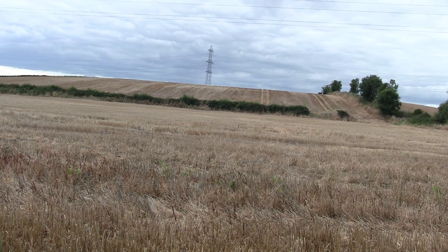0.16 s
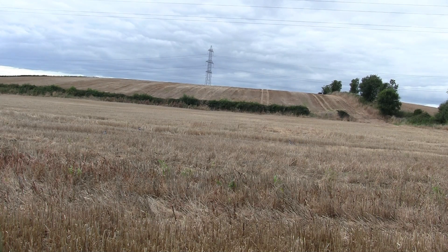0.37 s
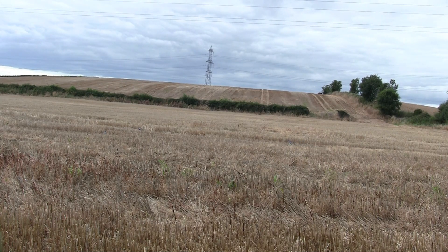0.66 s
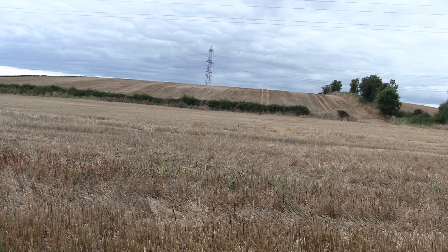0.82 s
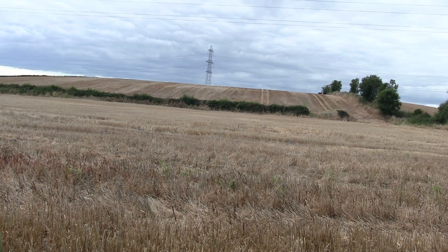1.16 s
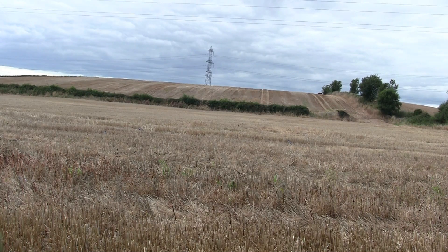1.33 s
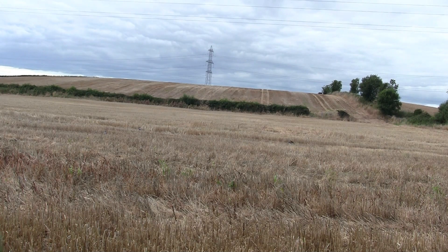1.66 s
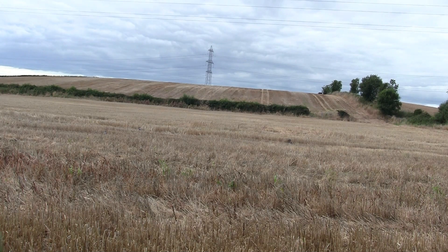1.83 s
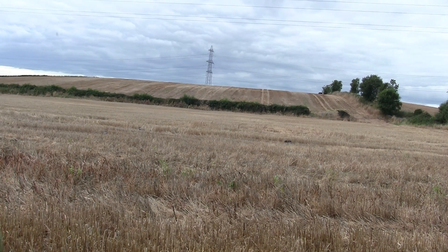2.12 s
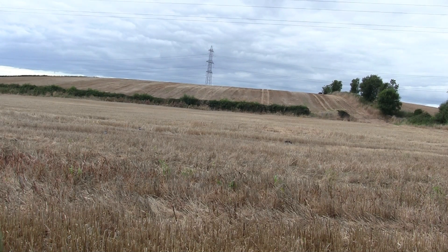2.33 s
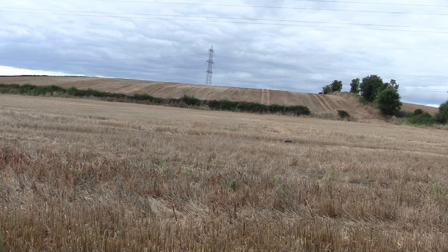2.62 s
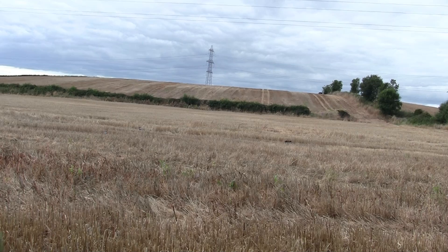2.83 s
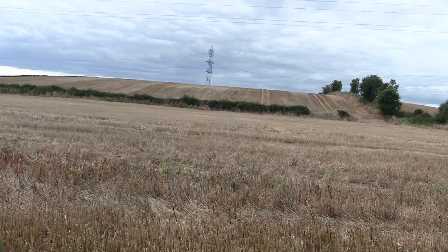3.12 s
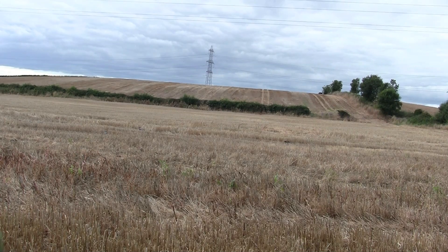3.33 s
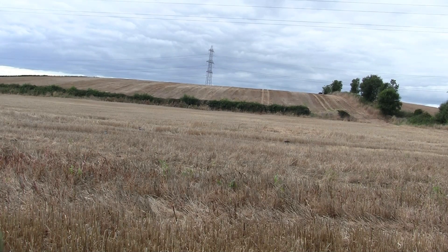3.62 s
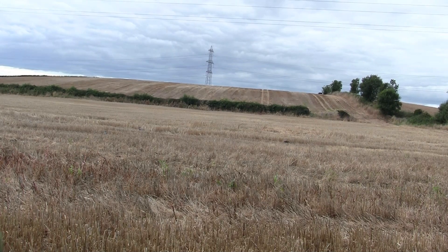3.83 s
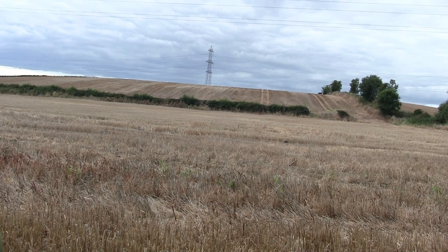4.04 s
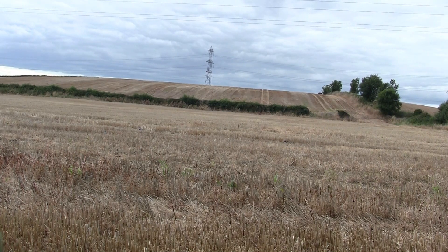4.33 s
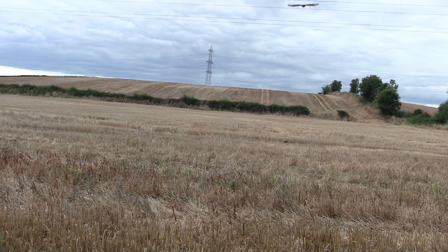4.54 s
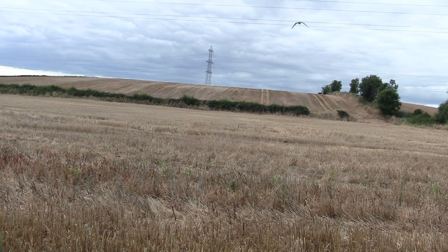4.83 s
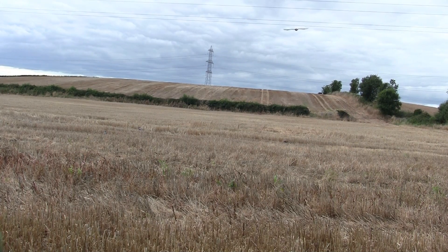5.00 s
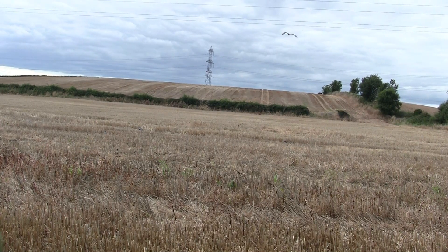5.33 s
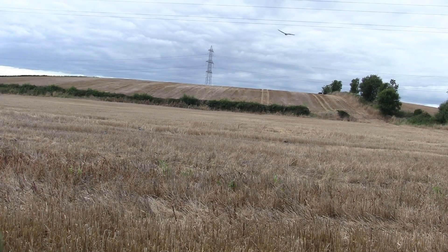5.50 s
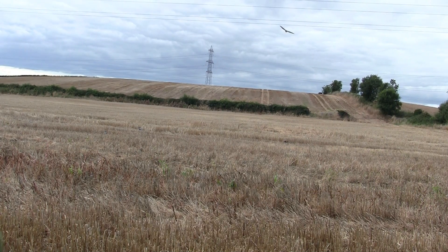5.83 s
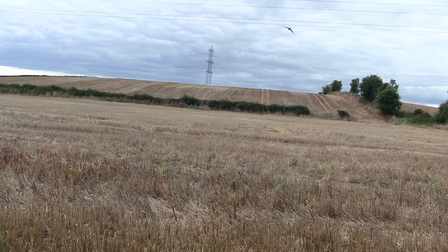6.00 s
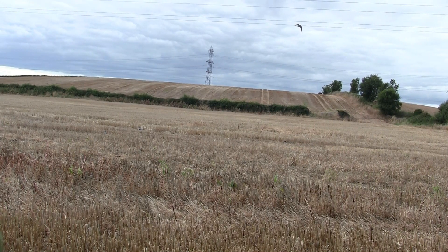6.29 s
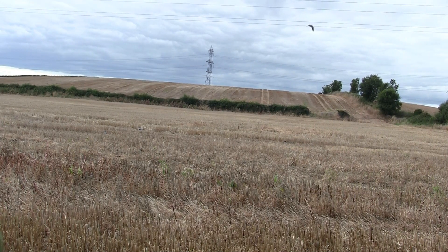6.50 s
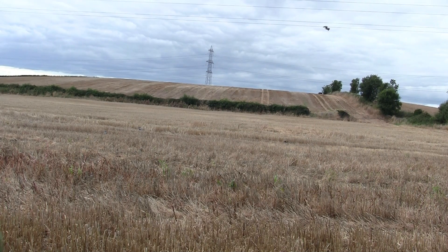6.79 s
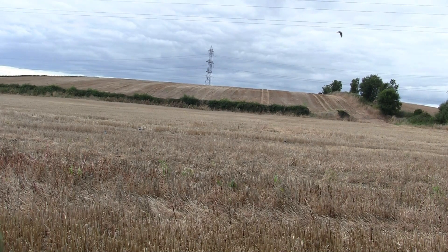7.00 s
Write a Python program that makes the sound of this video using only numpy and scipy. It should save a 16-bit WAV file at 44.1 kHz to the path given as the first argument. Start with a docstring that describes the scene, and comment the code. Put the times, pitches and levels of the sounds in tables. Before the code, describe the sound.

Loud plastic clicks close by, then plaintive bird-of-prey mews sinking in pitch, over a quiet rural rumble with soft rustling and faint chirps.

```python
"""Over a steady rural rumble of filtered noise, a small bird gives a few thin chirps: short arches of a sine tone.
Then plastic gear snaps and rattles close by as it is handled: noise cracks excite a hollow case and a metal fitting.
A soft hiss of rustling swells, and buzzards mew four times, the second and third calls overlapping: harmonics swoop up
to a crest, sink and break into a weak, hoarse tail, swelling as one slides through the resonance of the beak.
The recorder's gain ducks after sounds with strong treble, such as the loudest clicks, and creeps back."""
import sys
import numpy as np
from scipy import signal
from scipy.fft import rfft, irfft
from scipy.io import wavfile
from scipy.ndimage import uniform_filter1d

SR = 44100
rng = np.random.default_rng(int(sys.argv[2]) if len(sys.argv) > 2 else 0)


def master_out(mix):
    """Clip the mix to full scale and print it as 16-bit PCM to the path in sys.argv[1]."""
    frames = np.transpose(np.atleast_2d(mix))
    ceiling = np.clip(frames, -1, 1)
    pcm = np.round(ceiling * 32767).astype(np.int16)
    wavfile.write(sys.argv[1], SR, pcm)


N = 315315
TIME = np.arange(N) / SR

# spectrum of the far rumble: frequency_hz, level_db
FIELD_SPECTRUM = [(15, -48), (25, -15.5), (97, -4.5), (363, -6.5), (489, -6), (575, -8), (775, -4.5),
                  (840, -6.5), (1020, -9.5), (1890, -22), (3820, -25), (5140, -26.5), (6050, -27),
                  (14800, -39.5), (16000, -42.5)]
# likeness of the rumble in the two channels: frequency_hz, correlation (-1 to 1)
CHANNEL_LIKENESS = [(40, 0.4), (100, 0.23), (200, 0.53), (380, .4), (480, 0.92), (1050, 0.9), (1500, .2),
                    (2200, 0.039), (12000, .08)]
FIELD_DB = -50
# spectrum of the rustling: frequency_hz, level_db
RUSTLE_SPECTRUM = [(500, -22), (1500, 4), (3000, 0.5), (5500, -2), (10000, -8.5), (13000, -12),
                   (16000, -29)]
# swells of soft rustling: start_s, length_s, level_db
RUSTLE_SWELLS = [(1.856, 0.85, -54), (2.596, 0.68, -67), (3.433, 0.65, -57), (3.958, 0.06, -44.5),
                 (4.284, 0.6, -50.5), (5.17, 0.38, -53.5)]
RUSTLE_EDGE = 0.16  # scale of a swell's rise and fall, as a share of its length
RUSTLE_REST_DB = -70
# calls of the small bird: start_s, length_s, middle_hz, slide_hz, level_db
BIRD_CHIRPS = [(0.187, .08, 5220, 700, -56), (.372, 0.074, 5300, -500, -59.5),
               (1.157, 0.035, 5250, 80, -63), (1.469, 0.066, 4720, -800, -39),
               (4.963, 0.055, 5230, 139, -61), (5.135, 0.072, 5520, -500, -61)]
CHIRP_ARCH_HZ_PER_S = 17000  # the longer a chirp, the higher its middle lies above its ends
# handling clicks: start_s, level_db, relative bass_db, relative rattle_db
HANDLING_CLICKS = [(1.5239, -15, -12.5, -1), (1.841, -40, -30, -17), (1.9113, -29, -13.5, 5),
                   (1.939, -35.5, -3, -9), (2.2358, -29, -9.5, -15.5), (2.361, -4, -26.5, -9),
                   (2.427, -19, -26, 6), (2.4722, -7.5, -33, 12), (2.4811, -6.5, -34, 0),
                   (2.5084, -30, -8, 8), (2.5228, -4, -26, 3.5), (2.674, -10, -32, -7),
                   (2.7247, -23, -11, 14), (2.733, -4.5, -28, -4), (2.7494, -11.5, -31, 6),
                   (2.7811, -10, -27, 4), (2.796, -6.5, -24.5, 11), (2.8142, -11, -23.5, 8),
                   (2.8453, -4.5, -27.5, -11.5), (2.8982, -31.5, -42, -3)]
# catches that snap shut: start_s, level_db, relative bass_db, rebound_after_s
SNAPPING_CATCHES = [(1.359, 0.5, -26.5, .018), (3.2208, -7, -39, 0.023)]
# the blows of a catch, slip, seat and rebound: relative level_db, left_minus_right_db, relative rattle_db
CATCH_BLOW_ROWS = [(-1.5, 19.5, -12), (-2, 7.5, -10.5), (-9.5, 3.5, -1.5)]
SEAT_S = 0.0052  # the catch seats this long after it slips
CLICK_PAN_DB = 6  # the gear is held to the left
TREBLE_DB, TREBLE_DB_PER_DB = -1, 0.37  # treble against the middle band; softer blows are duller
# spectrum of the plastic case: frequency_hz, level_db
CASE_SPECTRUM = [(88, -39), (150, -22), (439, -19.5), (759, -4.5), (1450, -7), (1900, -4.5), (3160, -3.5),
                 (3550, -7.5), (4410, -0.5), (4860, -2.5), (5570, 4.5), (6640, -2), (7770, -4.5),
                 (11500, -13.5), (16000, -18)]
# modes of the hollow in the case: frequency_hz (before detuning), level_db, t60_s
HOLLOW_MODES = [(313, -1.5, 0.14), (560.4, -3.5, 0.17), (846, -3, .05)]
# modes of a small metal fitting that rings along: frequency_hz, level_db, t60_s
FITTING_MODES = [(1970, -51, .5), (3698, -35.5, 0.31), (3900, -44, .2), (4870, -47, 0.35),
                 (6660, -40, 0.25)]
# pitch curve of each mew, from its crest to its end: time_s, pitch_hz
MEW_PITCH = [
    [(2.161, 1533), (2.196, 1434), (2.221, 1221), (2.263, 1329), (2.307, 1044), (2.325, 1299),
     (2.357, 1352), (2.42, 880), (2.506, 941), (2.556, 1080), (2.634, 644)],
    [(3.743, 1288), (3.789, 1211), (3.897, 945), (4.04, 767), (4.13, 753), (4.2, 636.7), (4.281, 617.3),
     (4.34, 487.5), (4.412, 411.5)],
    [(4.125, 1424), (4.26, 1203), (4.28, 1419), (4.425, 1032), (4.476, 1002), (4.49, 821), (4.516, 774),
     (4.534, 1020), (4.57, 1004), (4.595, 780), (4.64, 659), (4.741, 740)],
    [(6.5, 1422), (6.559, 1395), (6.618, 1239), (6.695, 1104), (6.73, 1189), (6.815, 1114), (6.835, 732),
     (6.924, 736), (6.946, 650), (6.975, 746), (7.023, 735), (7.065, 593)],
]
# mews: start_s, swoop_s, level_db, scrape_db, break_s, break_drop_db, release_s, left_minus_right_db
MEW_ROWS = [(2.09, .023, -19, -10, 2.38, -7.5, 0.01, -6.5), (3.65, .039, -20, -19, 3.97, -4.5, .015, -7.5),
            (4.056, 0.022, -24.5, -9, 4.395, -6.5, 0.11, 2.5),
            (6.384, .026, -35.5, -11, 6.85, -5.5, 0.0092, 0.5)]
# voice of each mew: throat tuning_ratio, beak_hz, partials under the throat's peak under_db, overtone_db,
# their flare at the crest flare_db, treble_db_per_octave, rasp (0-1), end_rasp (0-1), echo_db, left_late_ms
MEW_VOICES = [(1.055, 2510, 9, -3, 17.5, -2.5, 0.17, 0.6, -19, 0.29),
              (0.95, 2105, 8, 0, -1, -2, .09, .1, -39, .22),
              (1.004, 2565, 4.5, -2, 5, -16.5, 0.08, 0.6, -15, 0.054),
              (0.99, 2510, 4, 2, 1, -8, .05, 0.39, -14.5, 0.053)]
# throat and open beak at a tuning ratio of 1: frequency_hz, level_db
THROAT_SPECTRUM = [(400, -27.5), (750, -22.5), (1000, -25), (1300, -18), (1600, -11), (2000, 3.5),
                   (2450, 4), (2900, -5), (3300, -21), (4300, -20), (6000, -31), (9000, -36), (14000, -51)]
SWOOP = .55  # share by which a mew starts below its pitch
ATTACK_S, ATTACK_DB = 0.032, -19  # a mew opens in this time from this level
BREAK_S = 0.028  # time the voice takes to break
EFFORT_DB_PER_OCTAVE = 10.5  # the voice weakens as its pitch sinks
DULLING_DB_PER_OCTAVE = 4  # overtones fade faster than the rest as the pitch sinks
STRAIN_OCTAVES = 0.17  # overtones flare only about this close to the crest
UNDERTONE_DB = 7.5  # the fundamental is raised by this much once the voice has broken
BEAK_DB, BEAK_WIDTH_HZ = 8.5, 83  # sharp resonance on top of the throat's broad one
TOP_HZ = 16000  # top of the recorder's band


def undb(db):
    """Logarithmic level: decibels become an amplitude gain."""
    return 10 ** (np.asarray(db) / 20)


def unit(x):
    """Normalisation: the signal is scaled to rms 1."""
    return x / np.sqrt(np.mean(x ** 2))


def lookup(points, hz):
    """Interpolation: (frequency_hz, value) points are read on a log-frequency axis."""
    f, value = np.transpose(points)
    return np.interp(np.log(np.maximum(hz, 1)), np.log(f), value)


def colour(x, points):
    """Linear filtering: a (frequency_hz, level_db) response that falls away below its first point."""
    hz = np.arange(x.shape[-1] // 2 + 1) * SR / x.shape[-1]
    gain = undb(lookup(points, hz)) * np.minimum(hz / points[0][0], 1) ** 2
    return irfft(rfft(x) * gain, x.shape[-1])


def band(x, lo_hz, hi_hz):
    """Causal band-pass: only the sound between two frequencies is let through."""
    edges = [lo_hz, min(hi_hz, SR / 2 - 1)]
    return signal.sosfilt(signal.butter(2, edges, "band", fs=SR, output="sos"), x)


def walk(rate):
    """Smoothed chance: a random course of rms 1 that changes about `rate` times a second."""
    k = max(int(SR / rate), 1)
    steps = rng.standard_normal(N)[np.arange(N) // k]
    return unit(uniform_filter1d(uniform_filter1d(steps, k), k))


def pan(db):
    """Level difference between the ears: left and right gains of constant total power."""
    gains = undb(np.array([db, -db]) / 2).reshape(2, -1)
    return gains / np.sqrt(np.mean(gains ** 2, axis=0))


def lag(pair, left_late_ms):
    """Time difference of arrival: sound from one side reaches the two microphone ports at different times."""
    hz = np.arange(N // 2 + 1) * SR / N
    turn = np.exp(np.pi * 1j * hz * left_late_ms / 1000 * np.array([[-1], [1]]))
    return irfft(rfft(pair) * turn, N)


def scatter(x, t60, delay):
    """Diffuse reflection: a decaying noise tail of unit energy, different on each side."""
    t = TIME[:SR]
    tail = rng.standard_normal((2, SR)) * undb(-60 * t / t60) * (t > delay)
    tail /= np.sqrt(np.sum(tail ** 2, axis=1, keepdims=True))
    return signal.fftconvolve(x[None], tail, axes=1)[:, :N]


def ring(modes, t, detune):
    """Modal vibration: a sum of decaying sines, each detuned at random by the share `detune`."""
    out = 0
    for hz, db, t60 in modes:
        mode_hz = hz * (1 + detune * rng.standard_normal())
        out = out + undb(db - 60 * t / t60) * np.sin(2 * np.pi * mode_hz * t)
    return out


def field():
    """Partial coherence: mid and side noise form the far rumble of open country, with a low drone in it."""
    mid, side = colour(rng.standard_normal((2, N)), FIELD_SPECTRUM)
    alike = np.clip(lookup(CHANNEL_LIKENESS, np.arange(N // 2 + 1) * SR / N), -1, 1)
    mid = irfft(rfft(mid) * np.sqrt(1 + alike), N)
    side = irfft(rfft(side) * np.sqrt(1 - alike), N)
    air = unit(mid + side * np.array([[1], [-1]])) * undb(FIELD_DB + 0.72 * walk(7.0))
    drone = undb(-65) * unit(band(rng.standard_normal(N), 91.6, 100.7))
    # earlier on the left, a little stronger on the right
    return lag((air + drone) * pan(-2.2), left_late_ms=-0.25)


def rustle():
    """Addition of powers: a soft dry hiss whose swells rise, hold and die away over a faint rest level."""
    hiss = unit(colour(rng.standard_normal((2, N)), RUSTLE_SPECTRUM))
    power = undb(RUSTLE_REST_DB) ** 2
    for s, length, db in RUSTLE_SWELLS:
        inside = np.minimum(TIME - s, s + length - TIME) / length
        power = power + undb(db) ** 2 * (1 + np.tanh(inside / RUSTLE_EDGE)) / 2
    return hiss * np.sqrt(power) * undb(0.88 * walk(36))


def chirps():
    """Frequency modulation: thin whistles, each a small tilted arch of pitch, with diffuse reflections."""
    out = np.zeros(N)
    for s, length, middle_hz, slide_hz, db in BIRD_CHIRPS:
        u = np.linspace(0, 1, int(length * SR))
        arch_hz = CHIRP_ARCH_HZ_PER_S * length * (2 * u - 1) ** 2
        hz = middle_hz + slide_hz * (u - .5) - arch_hz
        hz = hz * (1 + .012 * walk(600)[:len(u)])
        tone = np.sin(2 * np.pi * np.cumsum(hz) / SR)
        first = int(s * SR)
        out[first:first + len(u)] += undb(db) * np.sin(np.pi * u) * tone
    return out + undb(-14.5) * scatter(out, t60=.2, delay=0.024)


def blows():
    """Succession of impacts: every blow as start_s, level_db, left_minus_right_db, bass_db, rattle_db."""
    rows = [(s, db, CLICK_PAN_DB, bass_db, rattle_db) for s, db, bass_db, rattle_db in HANDLING_CLICKS]
    for s, db, bass_db, rebound_s in SNAPPING_CATCHES:
        for after, (blow_db, pan_db, rattle_db) in zip((0, SEAT_S, rebound_s), CATCH_BLOW_ROWS):
            rows.append((s + after, db + blow_db, pan_db, bass_db, rattle_db))
    return rows


def clicks():
    """Impact excitation: a short crack and dying rattle of the case; its hollow knocks, a metal fitting rings."""
    out, t = np.zeros((2, N + SR)), TIME[:SR // 2]
    for s, db, pan_db, bass_db, rattle_db in blows():
        treble_db = TREBLE_DB + TREBLE_DB_PER_DB * db
        crack = np.exp(-np.abs(t - .0025) / np.where(t < .0025, .0005, .0012))
        rattle = undb(rattle_db) * np.exp(-t / 0.01) * np.minimum(t / 0.0053, 1)
        # partly shared by the two channels
        noise = rng.standard_normal((2, len(t))) + 0.51 * rng.standard_normal(len(t))
        snap = colour(noise, CASE_SPECTRUM) * (crack + rattle)
        bass = unit(band(snap, 220, 760))
        middle = unit(band(snap, 1750, 4350))
        treble = unit(band(snap, 5760, 14000))
        snap = middle + undb(bass_db + 12.0) * bass + undb(treble_db) * treble
        snap *= 2 / np.sqrt(np.sum(snap ** 2, axis=1, keepdims=True))
        knock = undb(bass_db - 4.5) * ring(HOLLOW_MODES, t, detune=0.048)
        # only hard blows shake the fitting much
        metal = undb(1.3 * db) * ring(FITTING_MODES, t, detune=0)
        sound = pan(pan_db) * (undb(13) * snap + metal) + knock
        first = int(s * SR)
        out[:, first:first + len(t)] += undb(db) * sound
    return lag(out[:, :N], left_late_ms=-.23)


def mew(curve, start, swoop_s, db, scrape_db, break_s, drop_db, release_s, pan_db,
        tuning, beak_hz, under_db, overtone_db, flare_db, treble_db, rasp, end_rasp, echo_db, left_late_ms):
    """Source and filter: the syrinx's harmonics slide through throat and beak resonances; effort follows pitch."""
    s, hz = np.transpose(curve)
    on = (TIME > start) & (TIME < s[-1])
    t = TIME[on]
    age, left = t - start, s[-1] - t
    pitch = uniform_filter1d(np.interp(t, s, hz), int(0.0053 * SR))
    pitch = pitch * (1 - SWOOP * np.exp(-age / swoop_s))
    sag = np.log2(pitch.max() / pitch)  # octaves below the crest
    broken = np.clip((t - break_s) / BREAK_S + .5, 0, 1)

    attack_db = ATTACK_DB * np.maximum(1 - age / ATTACK_S, 0)
    effort_db = db + attack_db - EFFORT_DB_PER_OCTAVE * sag + drop_db * broken
    envelope = undb(effort_db) * np.minimum(age / .004, 1) * np.minimum(left / release_s, 1)
    flare = flare_db * np.exp(-(sag / STRAIN_OCTAVES) ** 2)
    overtones = overtone_db - DULLING_DB_PER_OCTAVE * sag + flare
    # start and end are the hoarsest, and hoarseness unsteadies the pitch
    hoarse = rasp + .8 * np.exp(-(age / 0.024) ** 2) + end_rasp * np.exp(-(left / .24) ** 2)
    pitch = pitch * (1 + 0.032 * hoarse * walk(500)[on] + (0.0019 + .03 * hoarse) * walk(80)[on])
    phase = 2 * np.pi * np.cumsum(pitch) / SR

    voice = 0
    for k in range(1, 15):
        f = k * pitch / tuning  # place on the throat's own scale
        above = np.clip((f - 2900) / 500, 0, 1)
        below = np.clip((1900 - f) / 400, 0, 1)
        beak_db = BEAK_DB / (1 + ((k * pitch - beak_hz) / BEAK_WIDTH_HZ) ** 2)
        distance_db = treble_db * np.log2(np.maximum(f / 3800, 1))
        # each overtone above the throat's peak flickers alone
        flicker = np.interp(t, TIME[::800], rng.standard_normal(len(TIME[::800])))
        flutter_db = 6.9 * above * flicker
        source_db = above * overtones + below * under_db + (k == 1) * UNDERTONE_DB * broken
        partial_db = source_db + lookup(THROAT_SPECTRUM, f) + beak_db + distance_db + flutter_db
        voice = voice + undb(partial_db) * np.sin(k * phase)

    # air rushes through the throat, strongest once in each cycle
    rush = unit(colour(rng.standard_normal(N), THROAT_SPECTRUM))[on] * (1 + 0.46 * np.cos(phase))
    rough_voice = voice * (1 + 0.26 * hoarse * walk(980)[on])
    call = np.zeros(N)
    call[on] = (rough_voice + 0.7 * hoarse * rush) * envelope
    call[on] *= undb(2.38 * walk(55)[on])  # restless air makes the level flutter
    # the voice catches with a short scrape as it opens
    call[on] += rush * np.exp(-((age - .014) / .009) ** 2) * undb(db + scrape_db)
    # reflections off the nearby ground beat with the gliding tone; hedges and slopes answer later
    near = call + undb(-12) * scatter(call, t60=.055, delay=.002)
    far = undb(echo_db) * scatter(call, t60=0.72, delay=0.015)
    return lag(near * pan(pan_db), left_late_ms) + far


def scene():
    """Superposition: the open field, the small bird, the handled gear and the buzzards add linearly."""
    birds = sum(mew(curve, *row, *voice) for curve, row, voice in zip(MEW_PITCH, MEW_ROWS, MEW_VOICES))
    return field() + rustle() + chirps() + clicks() + birds


def gain_control(x, threshold_db, slope, attack, release):
    """Delayed compression: strong treble pulls the gain down a moment later; it creeps back (times in s)."""
    power = uniform_filter1d(band(x, 4000, 18000) ** 2, int(0.0067 * SR)).max(axis=0)
    over_db = np.maximum(10 * np.log10(np.abs(power) + 1e-12) - threshold_db, 1e-9)
    # hold each peak and let it decay exponentially
    held_db = np.exp(np.maximum.accumulate(np.log(over_db) + TIME / release) - TIME / release)
    step = 1 / (attack * SR)
    return x * undb(-slope * signal.lfilter([step], [1, step - 1], held_db))


def record(dry):
    """Nonlinear recording chain: gain control, own hiss, overload that thumps, and a steep top cut."""
    wet = gain_control(dry, threshold_db=-13.5, slope=2.92, attack=0.07, release=0.18)
    wet = wet + undb(-65) * rng.standard_normal((2, N))
    thump = undb(-26) * band(np.maximum(np.abs(wet) - .5, 0), 5, 200)
    top_cut = signal.ellip(8, .2, 70, TOP_HZ, fs=SR, output="sos")
    return signal.sosfilt(top_cut, np.clip(wet + thump, -1, 1))


dry = scene()
out = record(dry)
master_out(out)
```